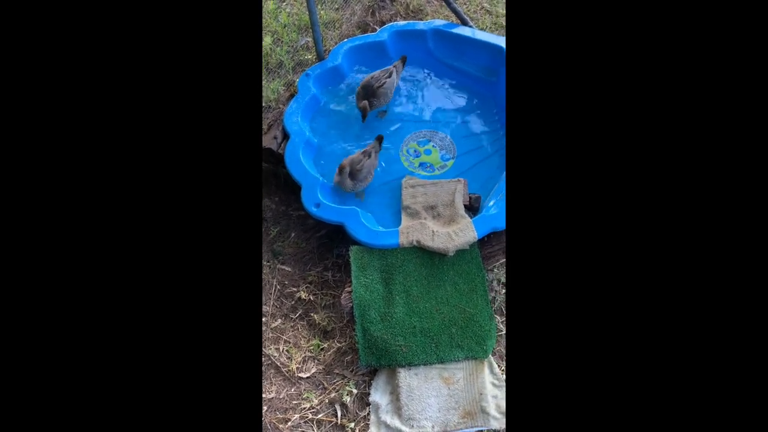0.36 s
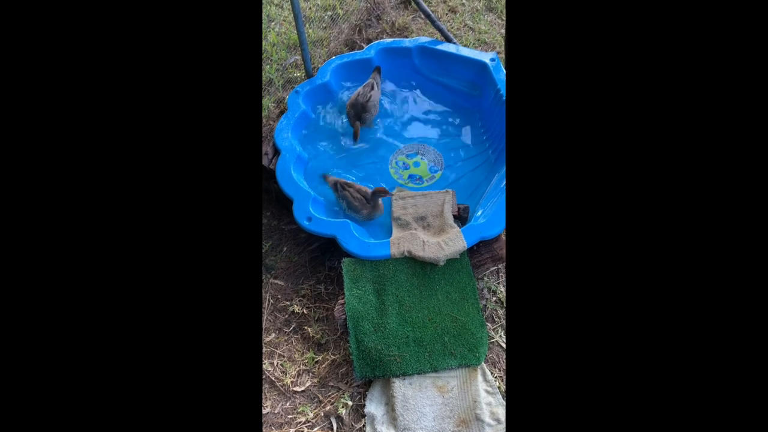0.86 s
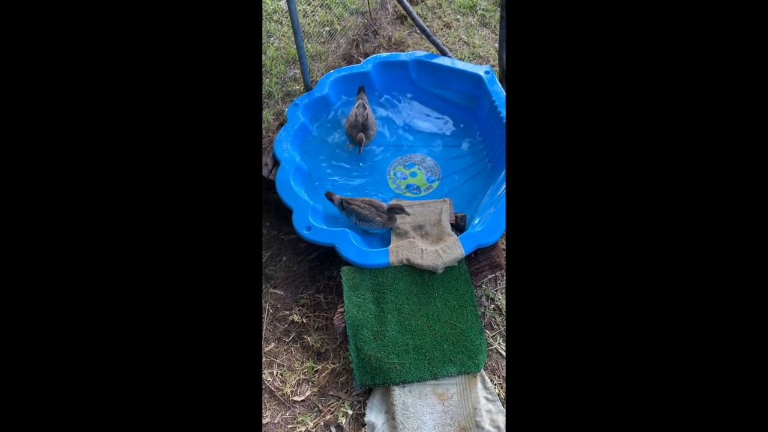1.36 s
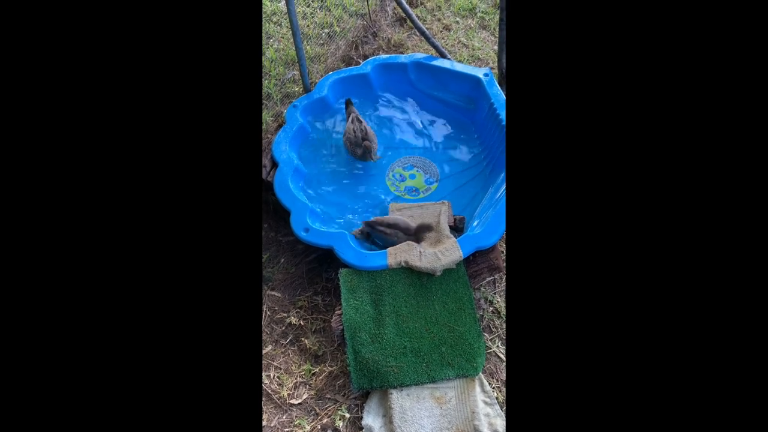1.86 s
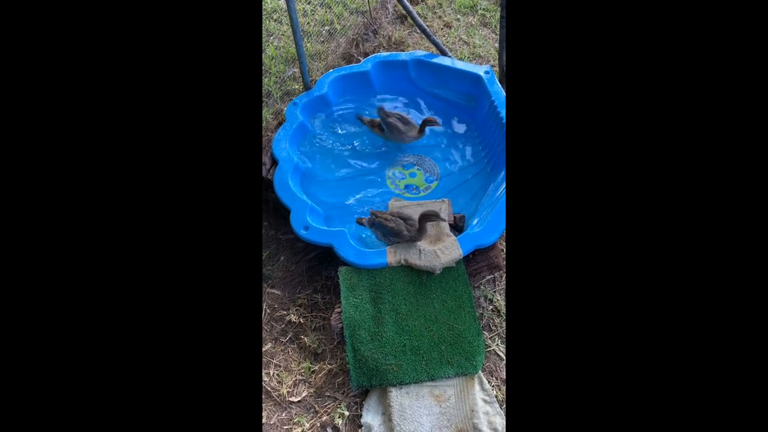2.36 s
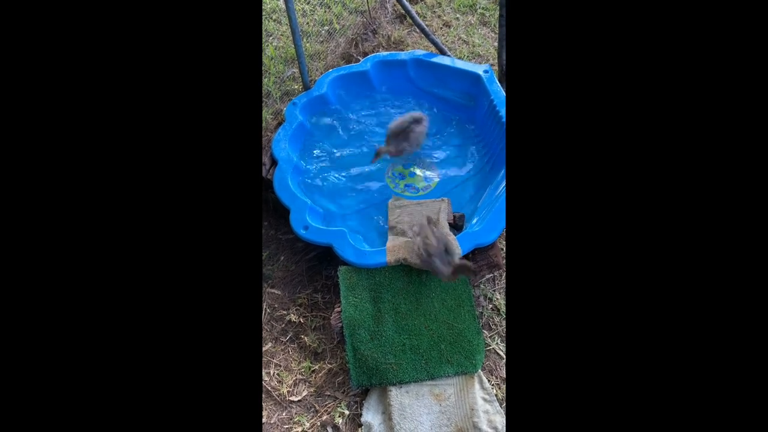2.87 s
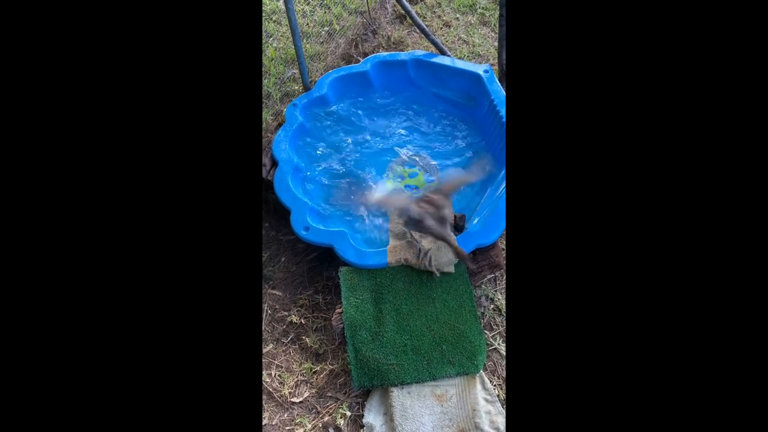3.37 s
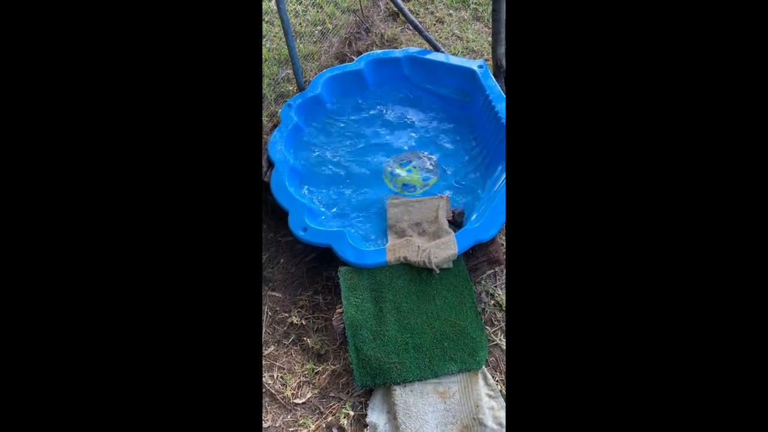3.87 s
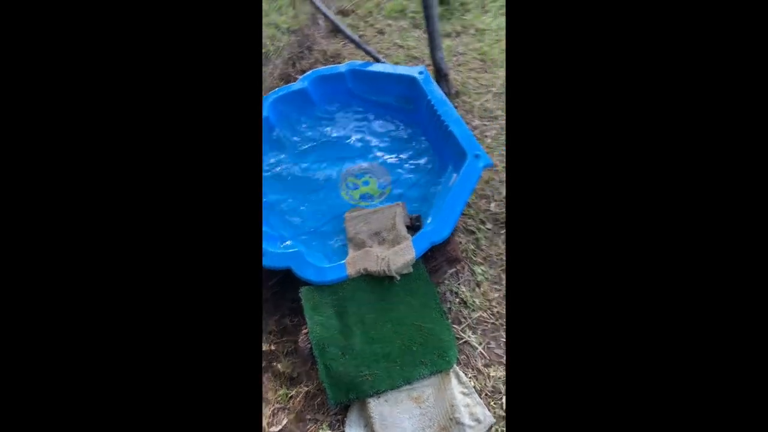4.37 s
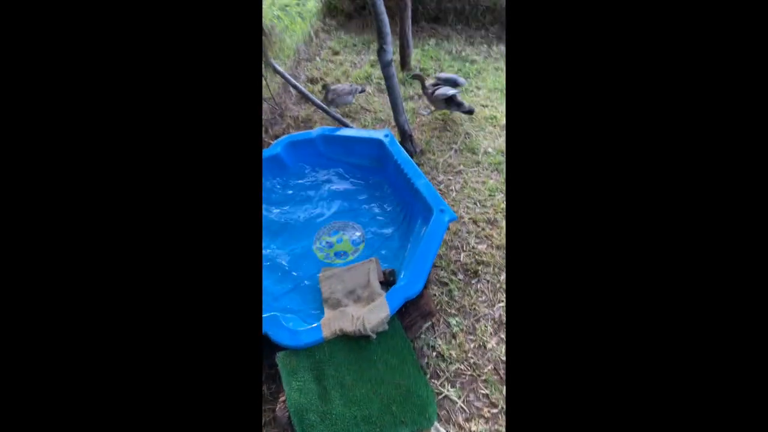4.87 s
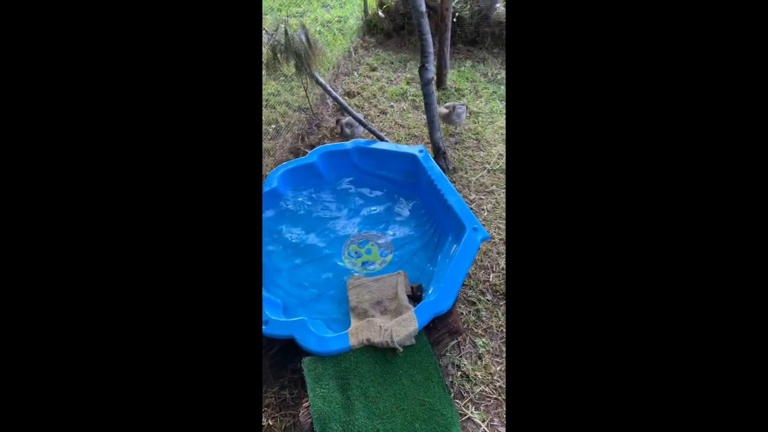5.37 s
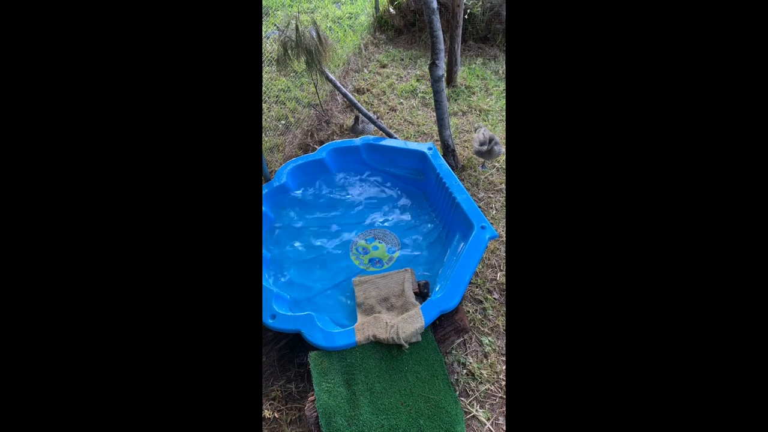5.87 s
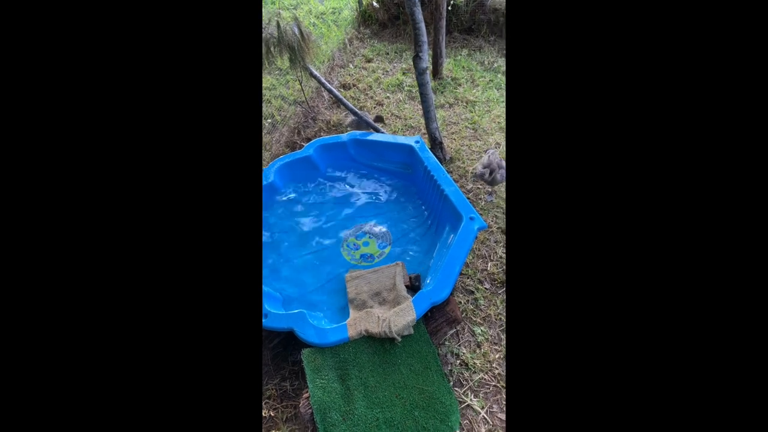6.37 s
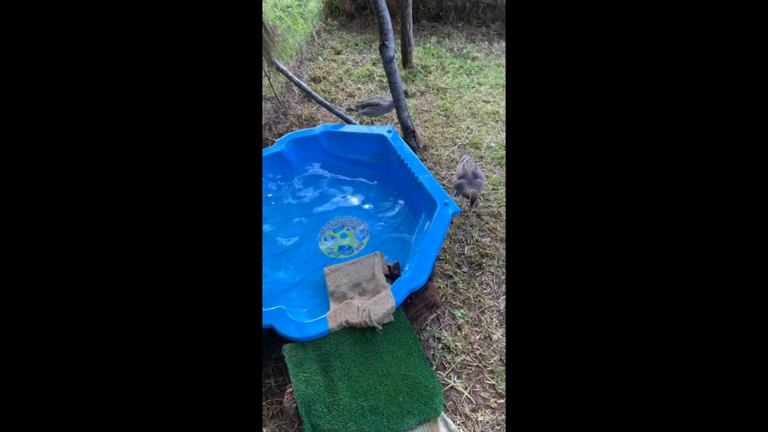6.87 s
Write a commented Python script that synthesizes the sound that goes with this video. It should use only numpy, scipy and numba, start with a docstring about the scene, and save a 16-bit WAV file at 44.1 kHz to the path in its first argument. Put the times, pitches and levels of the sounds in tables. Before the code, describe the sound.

Outdoors in a quiet garden, close to a phone. Soft peeps and a small knock come first, then a run of loud, high whistles that crack upward. Paddling bursts into splashing, builds to violent thrashing with hollow plops, gurgles and hissing spray, then drops away. Wet wings flutter out fine spray on the lawn, and a few drips and faint peeps remain over low rumble.

```python
"""Two ducklings in a shallow plastic pool on a lawn, a metre or two from a phone, which is knocked early on.
First come peeps, then held near-sine whistles that break upward; paddling grows into thrashing, in which
trapped air rings as decaying sines, drops tick as noise cracks, and filtered noise sloshes, gurgles and hisses.
Wet wings are then shaken out on the lawn as bursts of fine spray, and sparse drips and faint peeps follow.
Coloured noise makes a quiet garden rumble throughout; two ports hear the treble at different moments."""
import sys
import numpy as np
from scipy import signal
from scipy.fft import rfft, irfft
from scipy.io import wavfile
from scipy.ndimage import uniform_filter1d
from numba import njit

SR = 44100
rng = np.random.default_rng(int(sys.argv[2]) if len(sys.argv) > 2 else 0)


def store_pcm(level_fs):
    """Save levels as 16-bit WAV."""
    pcm = np.round(np.clip(level_fs, -1, 1) * 32767).astype(np.int16)
    wavfile.write(sys.argv[1], SR, np.atleast_2d(pcm).T)


def volts_from_db(level):
    """Convert decibel levels to linear amplitude ratios."""
    exponent = np.asarray(level, float) / 20
    return 10 ** exponent


N = 308259
T = np.arange(N) / SR
HZ = np.arange(N // 2 + 1) * SR / N


def level(x, db):
    """Root-mean-square scaling: sets the mean power of a signal in dB."""
    return x * volts_from_db(db) / np.sqrt(np.mean(x ** 2))


def curve_db(points):
    """Logarithmic frequency scale: joins (Hz, dB) points by lines over log frequency."""
    hz, db = np.transpose(points)
    return np.interp(np.log(HZ + 1), np.log(hz), db)


def colour(x, points):
    """Spectral shaping: multiplies the spectrum by the gain through (Hz, dB) points."""
    return irfft(rfft(x) * volts_from_db(curve_db(points)), N)


def band(x, lo_hz, hi_hz):
    """Band-pass filtering: keeps the energy between two corner frequencies."""
    return signal.sosfilt(signal.butter(2, [lo_hz, hi_hz], "band", fs=SR, output="sos"), x)


def walk(rate):
    """Slow random modulation: normal values held 1 / rate s and smoothed twice; spread near 1."""
    hold = int(SR / rate)
    steps = np.repeat(rng.standard_normal(N // hold + 1), hold)
    return 1.54 * uniform_filter1d(uniform_filter1d(steps, hold), hold)[:N]


def add(out, s, x):
    """Superposition: mixes x in from time s."""
    i = max(int(s * SR), 0)
    out[i:i + len(x)] += x[:N - i]


def peeps():
    """Vocal nonlinearity: near-sine whistles break at the top into overtones, a half-pitch line and rasp."""
    # partials of the voice: multiple, calm_db in a steady whistle, wild_db where the voice breaks
    overtones = [(2, -25, -12), (3, -33, -30)]
    break_hz = 3050  # above this pitch the voice breaks
    out, tremor = np.zeros(N), walk(250)
    rasp = level(band(rng.standard_normal(N), 2000, 7300), 0)
    # level and pitch of a call warble together
    rough, warble = walk(1200), walk(110)
    for call in calls():
        s, hz, db = np.transpose(call)
        i = np.arange(int((s[0] - .005) * SR), int((s[-1] + .006) * SR))
        edge = np.clip(np.minimum(T[i] - T[i[0]], T[i[-1]] - T[i]) / .005, 0, 1)
        pitch = uniform_filter1d(np.interp(T[i], s, hz), size=130) * (1 + .012 * warble[i])
        broken = np.clip((pitch - break_hz) / 600., 0, 1)
        # the falling end stays hoarse
        hoarse = np.maximum(broken, .4 * np.maximum.accumulate(broken))
        shaken_pitch = pitch * (1 + (.008 + .05 * hoarse) * tremor[i])
        phase = 2 * np.pi * np.cumsum(shaken_pitch) / SR
        tone = np.sin(phase)
        for k, calm_db, wild_db in overtones:
            partial_db = calm_db + (wild_db - calm_db) * broken + throat_db(k * pitch)
            tone += volts_from_db(partial_db) * np.sin(k * phase)
        tone += .5 * broken ** 3 * np.sin(phase / 2)
        tone *= 1 + (.07 + .6 * hoarse) * rough[i] + .1 * tremor[i[::-1]]
        loudness = np.sqrt(2) * edge * volts_from_db(np.interp(T[i], s, db) + 2.6 * warble[i])
        # air keeps rushing through the break while the tone drops out
        air = uniform_filter1d(loudness, size=1200) * uniform_filter1d(broken, size=400)
        out[i] += loudness * tone + 0.26 * air * rasp[i]
    return out + reflections(out)


def reflections(calls_dry):
    """Diffuse reflection: pool wall and ground send back a short blur, as convolution with fading noise."""
    t = T[:int(.25 * SR)]
    blur = rng.standard_normal(len(t)) * np.exp(-t / .045) * (t > .004)
    # once the birds have run off across the lawn the blur weighs more
    wet_db = np.interp(T, [3.5, 4.5], [-15, -8])
    return volts_from_db(wet_db) * signal.fftconvolve(calls_dry, blur / np.linalg.norm(blur))[:N]


def throat_db(hz):
    """Formant resonance: gain of the throat on the overtones that pass it."""
    # throat resonance: centre_hz, width_hz, gain_db
    throat = (7320, 1900, 6)
    centre_hz, width_hz, db = throat
    return db * np.exp(-((hz - centre_hz) / width_hz) ** 2)


def calls():
    """Frequency and level contours: every call as points (s, Hz, dB), drawn from two shapes."""
    # long calls, a held whistle that breaks upward and drops:
    # start_s, break_s, end_s, first_hz, break_hz, whistle_db, swell_db into it, drop_db
    whistles = [(1.02, 1.103, 1.157, 1850, 2945, -38, 1, -45),
                (1.185, 1.238, 1.295, 2500, 2930, -31.5, 8.5, -43),
                (1.31, 1.362, 1.42, 2596, 3146, -29.5, 3.5, -34),
                (1.425, 1.497, 1.562, 2635, 3190, -24, 12.5, -40.5),
                (1.537, 1.549, 1.59, 2497, 3140, -36.5, 2, -53),
                (2.133, 2.192, 2.265, 1950, 3080, -30.5, 4, -33),
                (2.44, 2.487, 2.543, 2480, 2936, -31.5, 7, -33.5),
                (2.668, 2.708, 2.772, 2330, 2650, -29, 3, -27),
                (4.979, 5.0, 5.035, 1740, 2200, -51.5, .1, -58),
                (5.196, 5.211, 5.243, 2360, 2650, -57.5, 4, -62),
                (5.297, 5.324, 5.354, 2580, 2900, -63.5, 1.1, -57),
                (5.814, 5.823, 5.866, 2130, 2500, -45.5, 9, -53.5),
                (5.928, 5.963, 6.018, 2200, 2637, -47, -1.1, -53.5),
                (6.066, 6.094, 6.146, 2324, 2740, -44, 12, -49.5)]
    # the drop: share of the flight from break to end, ratio to break_hz, share of the leap left,
    # relative_db on drop_db
    fall = [(.55, 1.01, .7, -11), (.68, 1.01, .15, -0.3), (.8, .88, 0, -2), (1, .75, 0, -7)]
    # short arched peeps: start_s, length_s, first_hz, middle_hz, last_hz, level_db
    chips = [(0.072, 0.053, 1610, 2500, 1710, -61), (0.437, 0.037, 2010, 2440, 1900, -47),
             (0.606, 0.029, 2540, 2240, 1950, -50.5), (1.213, 0.031, 2040, 2340, 3000, -44),
             (1.255, .022, 2750, 2400, 1900, -47), (1.372, .02, 2800, 2450, 2050, -45),
             (1.432, 0.016, 2270, 2470, 2960, -41), (2.059, 0.028, 2180, 2580, 2160, -43),
             (4.117, .035, 2490, 2380, 2110, -57), (4.28, 0.024, 2760, 2440, 2060, -59),
             (4.4, 0.03, 2530, 2520, 2340, -57), (5.083, .03, 2183, 2470, 2716, -62),
             (5.72, .065, 3200, 3100, 3080, -68), (5.756, 0.053, 1632, 2170, 2240, -63),
             (6.242, 0.035, 1730, 2120, 1900, -53.5), (6.603, 0.028, 1930, 1853, 1580, -61),
             (6.77, 0.025, 1760, 1894, 1667, -67)]
    held, climb = .905, 1.005  # held pitch as a ratio to the break pitch, and its upward creep
    settle, lift_s = 0.3, .013  # share of the whistle to reach that pitch; time it is left ahead of the break
    out = []
    for start, brk, end, first_hz, break_hz, db, swell_db, drop_db in whistles:
        settled, flight = start + settle * (brk - start), end - brk
        lift = max(brk - lift_s, (settled + brk) / 2)
        # the longer the flight, the higher the leap and the more the tone fails at its top
        leap = np.clip(31 * (flight - .027), 0, .55)
        points = [(start, first_hz, db - swell_db - 9),
                  (settled, held * break_hz, db - swell_db),
                  (lift, climb * held * break_hz, db),
                  (brk, break_hz, db),
                  (brk + .27 * flight, (1 + leap) * break_hz, db - 480 * flight)]
        for share, ratio, left, rel_db in fall:
            points.append((brk + share * flight, (ratio + left * leap) * break_hz, drop_db + rel_db))
        out.append(points)
    u = np.linspace(-1, 1, 9)
    for start, length, first_hz, mid_hz, last_hz, db in chips:
        arch = mid_hz + (last_hz - first_hz) / 2 * u + ((first_hz + last_hz) / 2 - mid_hz) * u ** 2
        # both ends are 4 dB softer than the middle
        out.append(np.transpose([start + length * (u + 1) / 2, arch, db - 4 * u ** 2]))
    return out


def bubbles():
    """Bubble resonance: air pockets ring, climbing as they shrink or sinking as the hollow opens."""
    # pockets of air in the water, before wobble and flutter:
    # peak_s, peak_db, pitch_hz at the peak, t60_ms, initial glide in octaves per 10 ms
    pockets = [(.44, -49.5, 364, 60, -.05), (0.469, -44, 1530, 40, -.05), (.616, -28.5, 285, 72, -.28),
               (.639, -32.5, 233, 71, -.54), (0.903, -45, 2200, 16, .5), (.903, -42, 633, 89, .1),
               (0.915, -45.5, 1400, 34, .12), (1.052, -49.5, 567, 60, .07), (1.61, -40.5, 1007, 200, .02),
               (1.62, -42, 3970, 20, -.03), (1.69, -25.5, 847, 30, -.02), (1.692, -38, 1750, 18, -.4),
               (1.717, -23.5, 1136, 22, .8), (1.755, -23, 1110, 17, .3), (1.755, -15, 2054, 25, -.38),
               (1.76, -21, 377, 85, -.06), (1.848, -28, 1120, 19, -.5), (1.855, -26.5, 319, 82, -.1),
               (1.867, -28.5, 1050, 60, .01), (1.895, -22, 555, 45, -.16), (1.939, -24, 548, 37, .29),
               (1.941, -26, 1780, 15, .4), (1.964, -25, 1286, 22, -.33), (1.998, -30, 1280, 15, .3),
               (2.116, -32.5, 530, 69, .02), (2.145, -30.5, 1080, 52, .11), (2.264, -25, 307, 41, .05),
               (2.294, -27, 1486, 92, .07), (2.325, -27, 1590, 15, -.26), (2.328, -37.5, 916, 111, -.13),
               (2.364, -38, 4690, 15, -.06), (2.395, -26, 1171, 94, -.01), (2.429, -30.5, 940, 48, -.53),
               (2.451, -25.5, 904, 58, -.11), (2.472, -24.5, 319, 46, -.34), (2.543, -34.5, 770, 39, -.26),
               (2.571, -32, 324, 49, -.02), (2.593, -19, 1680, 16, -.14), (2.603, -28, 2200, 45, .15),
               (2.643, -28, 1610, 20, -.21), (2.667, -29, 645, 34, -.07), (2.692, -26, 510, 57, -.29),
               (2.702, -14.5, 300, 49, .32), (2.717, -14.5, 306, 47, .28), (2.776, -22, 310, 57, -.19),
               (2.878, -18, 2250, 36, .13), (2.903, -25.5, 658, 168, .04), (2.954, -32, 2807, 11, .37),
               (2.962, -21.5, 293, 97, .47), (2.975, -15, 597, 30, -.59), (2.988, -20.5, 760, 30, -.72),
               (2.992, -19, 272, 59, -.06), (3.003, -22.5, 2106, 25, .09), (3.014, -25, 241, 57, .04),
               (3.02, -25.5, 384, 60, -.03), (3.058, -27.5, 300, 50, -.5), (3.086, -19, 559, 180, .01),
               (3.099, -26, 1430, 31, -.16), (3.116, -25, 1570, 15, .67), (3.154, -26.5, 2640, 45, .06),
               (3.155, -14.5, 569, 30, -.7), (3.162, -17.5, 319, 39, -.27), (3.173, -21, 4140, 15, -.19),
               (3.171, -20, 880, 19, -.56), (3.173, -14, 1861, 74, -.03), (3.18, -20.5, 256, 60, -.08),
               (3.218, -25, 620, 37, -.25), (3.225, -27, 1335, 45, .09), (3.223, -21.5, 382, 54, -.21),
               (3.244, -19.5, 1095, 56, -.05), (3.262, -23.5, 1850, 52, -.09), (3.27, -25, 325, 64, -.14),
               (3.31, -30.5, 2510, 11, -.13), (3.339, -4.5, 596, 37, -.16), (3.349, -12, 385, 50, -.06),
               (3.363, -29.5, 300, 60, .11), (3.396, -29, 3130, 15, -.6), (3.412, -22, 1525, 11, -.01),
               (3.409, -20, 580, 37, .39), (3.428, -30.5, 911, 30, -.47), (3.457, -18.5, 1767, 34, -.17),
               (3.498, -24, 327, 82, -.11), (3.502, -21.5, 1240, 22, -.78), (3.536, -26, 853, 19, -.75),
               (3.54, -28, 320, 52, -.66), (3.562, -18.5, 1052, 52, -.01), (3.588, -32.5, 3600, 15, -.14),
               (3.632, -36, 1070, 26, -.38), (3.682, -37, 272, 60, .01), (3.713, -34.5, 1932, 22, -.11),
               (3.715, -29, 316, 63, -.19), (3.864, -37.5, 1943, 15, -.52), (4.345, -38.5, 1710, 9, -.69),
               (4.534, -43.5, 1780, 26, -.17), (5.765, -47, 1256, 30, .17)]
    out, wobble, flutter = np.zeros(N), walk(300), walk(500)
    turn = rng.random((len(pockets), 1))
    for (s, db, hz, t60_ms, glide), (start,) in zip(pockets, turn):
        # a pocket swells for a fixed time plus some cycles of its pitch
        rise, t60 = .0012 + 1.7 / hz, t60_ms / 1000
        t = np.arange(-2 * rise * SR, t60 * SR) / SR
        shape = np.where(t < 0, np.exp(-(t / rise) ** 4), 10 ** (-3 * np.abs(t) / t60))
        i = slice(int(s * SR), int(s * SR) + len(t))
        octaves = .4 * np.tanh(glide * t / .01 / .4)  # the glide levels off at 0.4 octave
        pitch = hz * 2 ** octaves * (1 + 0.044 * wobble[i])
        ring = np.sin(2 * np.pi * (start + np.cumsum(pitch) / SR))
        add(out, s - 2 * rise, volts_from_db(db + 2.5 * flutter[i]) * shape * ring)
    return out


def drops():
    """Impact transients: a sub-millisecond noise crack with a short spray tail, in body, tick and top."""
    # drops and slaps, and at 0.197 s the click of the knock on the phone, before band-pass: # start_s,
    # crack_db, body_db and top_db relative to the tick
    impacts = [(0.197, -17, -54, -2.5), (0.2678, -45.5, 6.5, -10), (1.6477, -32.5, 15.5, 2.5),
               (1.6886, -38.5, -10, -5), (1.6958, -14.5, 0, -5.5), (1.7375, -25, -4.5, -1.5),
               (1.7542, -12, 3.5, -1.5), (1.7799, -29.5, -28, 5), (1.9238, -23.5, -21, -20.0),
               (1.9395, -29, 13.5, 10.5), (1.9607, -25.5, -13, -4.5), (2.0765, -38, -6, -11),
               (2.0969, -31.5, -30, 3.5), (2.1087, -41, -8, 8), (2.2037, -40, 23.5, 4),
               (2.2813, -14.5, -21, 1.5), (2.286, -22, -10, -18), (2.3222, -27.5, 5.5, -10.5),
               (2.3631, -28, 3, 3), (2.3948, -20.5, -3, -4.5), (2.4337, -30, 2, -5), (2.5531, -29, -12, -8),
               (2.5579, -42, -14, -8), (2.5866, -35, 16.5, -3.5), (2.6375, -25, -28, -8),
               (2.6474, -23, -12.0, -12), (2.6609, -39, -5, 9), (2.8415, -24, 8.5, -1),
               (2.8619, -27, -13, 8), (2.8871, -17, 4.5, -3), (2.9495, -13.5, 6, 0), (3.0101, -16, 1.5, -9),
               (3.0163, -17.5, -7.5, 5), (3.036, -15, -1, -8), (3.0617, -26, -3.5, 8),
               (3.1144, -21, -7.5, 0), (3.1371, -17, -15, -11), (3.153, -15.5, 2.5, -1.5),
               (3.1899, -18.5, -0.5, 10), (3.2174, -12.5, -9.5, -1), (3.2224, 2, -20.5, -10.5),
               (3.2927, -28, -11.5, 1), (3.3083, -13.5, 1, -9), (3.3371, -15.5, -10.5, 0.5),
               (3.4065, -28.5, 6.5, 8), (3.4117, -30.5, 5, -2), (3.4636, -23, -12, -9), (3.534, -31, 3, -5),
               (3.5601, -30, 11.5, -5), (3.6312, -26, -8, 1.5), (3.6447, -35.5, -24.0, 13),
               (3.6694, -40.5, -13, 5), (3.709, -42, 2, -10), (3.7133, -17, -9.5, 2.5),
               (3.7173, -37, -15, -3), (3.806, -25, -2, 1), (3.9774, -32, -1, 0.5), (4.2111, -25, -10, -15),
               (4.2989, -43, -8, 8), (4.3184, -28, -5, 0.5), (4.3376, -25, -5.5, -0.5),
               (4.3443, -32, 6.5, -1.5), (4.5199, -35, -14, 13), (4.5371, -24.5, -6, 0.5),
               (4.6127, -43.5, -28.0, 17), (4.686, -53, -37, 2.0), (4.7252, -43.5, -19, 11),
               (4.9938, -40, 6.5, -1), (5.5266, -54, -14, 5), (5.5558, -45, -18, 7.5), (5.7207, -49, -7, 8),
               (5.9721, -35.5, -14, -7.5), (6.1487, -43, 6, 2), (6.9753, -44, -28, 11.5)]
    t = T[:int(.04 * SR)]
    layers = np.zeros((3, N))
    shape = (1 - np.exp(-t / 0.00021)) * (np.exp(-t / 0.00048) + volts_from_db(-12) * np.exp(-t / 0.0016))
    noise = rng.standard_normal((len(impacts), len(t)))
    for (s, db, body_db, top_db), grain in zip(impacts, noise):
        crack = grain * shape
        crack = crack / np.sqrt(np.mean(crack[:30] ** 2))  # unit rms over the first 30 samples
        for layer, rel_db in zip(layers, (body_db, 0, top_db)):
            add(layer, s, volts_from_db(db + rel_db) * crack)
    body, tick, top = layers
    return band(body, 1300, 4500) + band(tick, 3700, 9000) + band(top, 9300, 19845)


def churn():
    """Turbulence and cavity resonance: slosh, gurgles and spray; also gurgles that come from all round."""
    # resonances of the pool hollow: centre_hz, width_hz, relative_db
    hollow = [(225, 170, 5.5), (300, 38, 5), (580, 18, -21)]
    # spectrum of the spray noise: frequency_hz, relative_db
    spray_curve = [(600, -38.5), (1500, 0), (2500, -2.5), (4000, -0.8), (6500, 1.5), (8000, -6),
                   (10000, -13), (16000, -39)]
    # spectrum of the fine spray noise: frequency_hz, relative_db
    fine_curve = [(3000, -39), (7000, -14), (9500, -2.15), (12000, 1.5), (16000, 0)]
    gains = efforts()
    push = rng.standard_normal(N) * volts_from_db(3.2 * walk(60))
    slosh = sum(volts_from_db(db) * signal.lfilter(*signal.iirpeak(hz, hz / width, SR), push)
                for hz, width, db in hollow)
    crackle = rng.standard_normal(N) * volts_from_db(1.8 * walk(900) + 1.1 * walk(110))
    crackle = patchy(crackle, 500, 18000, count=14, flicker_db=3.0, rate=90)
    fizz = swarm(count=4000, lo_hz=2500, hi_hz=8300, cycles=33.0, scatter_db=1.5, glide=.2)
    spray = level(colour(crackle, spray_curve), 0) + 0.21 * fizz
    fine = level(colour(crackle, fine_curve), 0)
    layers = (slosh, gurgles(), spray, fine)
    water = sum(gain * level(x, 0) for x, gain in zip(layers, gains))
    around = volts_from_db(-8) * gains[1] * gurgles()
    return water, around


def gurgles():
    """Collective bubble sound: a swarm of small resonators over the noise of rushing water."""
    bubbling = swarm(count=3000, lo_hz=550, hi_hz=3200, cycles=35., scatter_db=4.5, glide=.25)
    rush = band(rng.standard_normal(N), 730, 2600) * volts_from_db(3 * walk(90))
    rush = patchy(rush, 300, 6000, count=8, flicker_db=4.0, rate=70)
    return level(bubbling + .8 * level(rush, 0), 0)


def swarm(count, lo_hz, hi_hz, cycles, scatter_db, glide):
    """Random superposition: many bubbles, a few much louder than the rest; rms 1."""
    when, pitch, size = rng.random((count, 3)).T
    hz = lo_hz * (hi_hz / lo_hz) ** pitch
    start = (when * N).astype(np.int64)
    loudness = volts_from_db(-scatter_db * np.log(1 - .98 * size))
    return level(rings(N, start, hz, cycles / hz, loudness, glide, 1. * SR), 0)


@njit
def rings(n, start, hz, t60, size, glide, sr):
    """Damped oscillation: small bubbles as sines that die away while their pitch rises."""
    out = np.zeros(n)
    for k in range(len(start)):
        length = int(t60[k] * sr)
        step = 2 * np.pi * hz[k] / sr
        fade = np.exp(-np.log(1000.) / (t60[k] * sr))
        phase, a = 0., size[k]
        for i in range(start[k], min(start[k] + length, n)):
            out[i] += a * np.sin(phase)
            phase += step * (1 + glide * (i - start[k]) / length)
            a *= fade
    return out


def patchy(x, lo_hz, hi_hz, count, flicker_db, rate):
    """Independent band modulation: narrow bands flicker as water patches burst at different sizes."""
    edges = np.geomspace(lo_hz, hi_hz, count + 1)
    spectrum = rfft(x)
    out = np.zeros(N)
    for lo, hi in zip(edges, edges[1:]):
        strip = irfft(spectrum * ((HZ >= lo) & (HZ < hi)), N)
        out += strip * volts_from_db(flicker_db * walk(rate))
    return out


def efforts():
    """Addition of powers: gains of slosh, gurgle, spray and fine spray from strokes, shakes and settling."""
    # strokes of feet, wings and bodies in the water:
    # peak_s, slosh_db, gurgle_db, spray_db, fade_ms (time to fade 20 dB)
    splashes = [(.19, -48, -58, -56, 89), (.613, -38.5, -68, -82, 43), (.645, -50.5, -75, -85, 68),
                (.915, -64, -57, -75, 125), (1.58, -53.5, -61.5, -76, 62), (1.637, -49.5, -42.5, -53.5, 62),
                (1.692, -38.5, -27, -28.5, 54), (1.758, -21, -21, -30.5, 37.5),
                (1.845, -44.5, -38, -56, 100), (1.894, -32, -39, -44.5, 107),
                (1.949, -25.5, -27.5, -41, 74), (1.995, -37, -36.5, -54.5, 60.5),
                (2.051, -37.5, -55, -75, 38), (2.103, -43, -49, -62, 80), (2.193, -40, -34, -46, 98),
                (2.264, -38.5, -62, -65, 41.5), (2.29, -38, -57, -41.5, 34), (2.34, -66, -44, -43.5, 105),
                (2.397, -40.5, -44.5, -39.5, 43), (2.452, -35, -35, -53, 127),
                (2.53, -36.5, -34.5, -59, 88), (2.594, -42, -33, -36.5, 61), (2.653, -47, -39.5, -43, 56),
                (2.7, -23.5, -40, -63, 61.5), (2.74, -36.5, -59, -40, 56), (2.765, -34.5, -52, -52.5, 59.5),
                (2.863, -46, -34.5, -33.5, 61), (2.895, -42, -26.5, -30.5, 107),
                (2.95, -30.5, -31.5, -35, 83), (2.985, -20, -26.5, -38.5, 60.5),
                (3.012, -27.5, -30, -31.5, 68.5), (3.082, -34, -31, -43.5, 110),
                (3.115, -32.5, -33.5, -40, 80), (3.152, -26.5, -21, -27.5, 60), (3.173, -21, -17, -26, 46),
                (3.219, -29, -32, -16, 22), (3.253, -26.5, -27, -32.5, 70.5), (3.323, -35.5, -35, -31, 49),
                (3.341, -21.5, -26, -30.5, 60), (3.37, -32, -40, -40, 70), (3.41, -36, -33.5, -37.5, 102.5),
                (3.455, -41, -36.5, -35.5, 89.5), (3.5, -30.5, -37, -41, 84),
                (3.536, -31.5, -40.5, -54, 45), (3.566, -46, -33.5, -40, 40), (3.63, -65.5, -55, -43.5, 98),
                (3.72, -39.5, -48, -54, 52)]
    # wet wings flapped and shaken on the lawn:
    # peak_s, fine_spray_db, spray_db, thud_db, fade_ms (time to fade 20 dB)
    shakes = [(3.5, -38, -60, -70, 50), (3.682, -38, -44, -47, 68), (3.714, -26, -37, -53, 39),
              (3.807, -39, -45.5, -58.5, 196), (3.979, -38, -57.5, -57, 210),
              (4.208, -41.5, -54, -61.5, 104.5), (4.243, -66, -64, -49, 44), (4.353, -39, -49.5, -50, 64),
              (4.46, -35.5, -62, -59, 88), (4.54, -37, -48, -56.5, 50), (4.643, -44, -55, -64, 45),
              (4.705, -35, -51, -57.5, 45), (4.815, -40.5, -63, -82, 85), (4.993, -53, -58, -72, 125),
              (5.1, -56, -80, -68, 54), (5.559, -50.5, -64, -73, 79), (5.723, -60, -65, -70, 71),
              (5.839, -61, -58.5, -65, 75), (5.972, -68, -53, -75, 68), (6.099, -76.5, -52.5, -72, 35),
              (6.148, -66, -57, -74, 55), (6.23, -64, -66, -63, 150), (6.549, -61, -62, -76, 99),
              (6.723, -64, -70, -70, 98), (6.966, -58, -71, -80, 100)]
    # water left rocking and dripping: time_s, slosh_db, gurgle_db, drizzle_db
    settling = [(0, -86, -73, -79), (.3, -67, -69, -83), (.9, -68, -78, -80), (1.1, -69, -71.5, -71),
                (1.55, -59, -64, -76), (1.8, -45, -46.5, -44.5), (2.1, -52, -50, -90), (2.8, -57, -45, -79),
                (3.1, -37, -35, -43.5), (3.6, -52, -58, -49), (4.15, -67, -66.5, -53.5),
                (4.7, -56, -77, -58), (5.2, -71.5, -77, -71), (5.701, -68, -76, -73.5),
                (6.05, -62.5, -68, -76), (6.2, -56.5, -66, -77), (6.45, -63, -90, -80.5),
                (7, -65, -79.5, -74)]
    s, *columns = np.transpose(settling)
    rest = [volts_from_db(np.interp(T, s, c)) ** 2 for c in columns]
    slosh, gurgle, spray = bursts(splashes, rise_shares=[0.54, 0.23, .25]) + rest
    mist, shed, thud = bursts(shakes, rise_shares=[0.46, 0.33, 0.45])
    return np.sqrt([slosh + volts_from_db(-3) ** 2 * thud,
                    gurgle + thud,
                    spray + shed,
                    volts_from_db(-0.5) ** 2 * spray + mist])


def bursts(rows, rise_shares):
    """Exponential decay: power envelopes of three level columns, a quick rise and an even fade in dB."""
    power = np.zeros((3, N))
    share = np.array(rise_shares)[:, None]  # rise time against fade time
    for s, *dbs, fade_ms in rows:
        fade = fade_ms / 1000
        i = slice(max(int((s - 2 * fade) * SR), 0), int((s + 2 * fade) * SR))
        t = T[i] - s
        slope_db = 20 * np.where(t > 0, t, -t / share) / fade
        power[:, i] += volts_from_db(np.array(dbs)[:, None] - slope_db) ** 2
    return power


def knock():
    """Damped chirp: a thump drops quickly from a click to the low wobble of the hand-held case."""
    # a knock on the phone: peak_db, extra_hz above the last pitch at first, last_hz,
    # glide_ms (time constant), t60_ms
    thump = (-28.5, 790, 55, 2, 174)
    db, extra_hz, last_hz, glide_ms, t60_ms = thump
    out, t_ms = np.zeros(N), 1000 * T[:int(.2 * SR)]
    pitch = last_hz + extra_hz * np.exp(-t_ms / glide_ms)
    wobble = np.sin(2 * np.pi * np.cumsum(pitch) / SR)
    add(out, .1975, volts_from_db(db) * 10 ** (-3 * t_ms / t60_ms) * wobble)
    return out


def garden():
    """Coloured noise: far traffic and leaves as a low rumble that swells, over a faint hiss."""
    # spectrum of the background: frequency_hz, relative_db
    garden_curve = [(20, -21), (35, -12.5), (55, 6.5), (90, 1), (200, -10.5), (400, -15), (700, -44),
                    (1200, -34.5), (1900, -28.5), (3500, -34.5), (8000, -34.5), (16000, -30)]
    noise = colour(rng.standard_normal(N), garden_curve)
    low = signal.sosfilt(signal.butter(2, 500, fs=SR, output="sos"), noise)
    return level(low * volts_from_db(1.7 * walk(5.5)) + (noise - low) * volts_from_db(1.4 * walk(18)), -57)


def ports(near, far, unalike):
    """Interchannel phase and level: all sound has a lead, near sound a tilt, and a part opposite signs."""
    # phase between the ports: frequency_hz, right_lead_rad
    port_lead = [(0, 0), (150, .15), (600, .9), (1300, 0), (2600, -1.2), (3700, -1.4), (4740, -np.pi),
                 (8870, -3 * np.pi), (13000, -5 * np.pi), (17140, -7 * np.pi), (22050, -7 * np.pi)]
    # level between the ports: frequency_hz, left_minus_right_db
    port_balance = [(40, .4), (300, 1.5), (600, -1.5), (1000, -4), (1500, -1.5), (2500, -4), (3400, 0),
                    (16000, 0)]
    # share of far or scattered sound that the ports hear unalike: frequency_hz, gain_db
    unalike_curve = [(60, -13), (150, -10), (400, 0), (2500, 0), (3600, -4), (4600, -25), (16000, -40)]
    # each port takes half of the difference
    lead = np.interp(HZ, *np.transpose(port_lead)) / 2
    tilt_db = curve_db(port_balance) / 2
    near, far, unalike = rfft(near), rfft(far), rfft(colour(unalike, unalike_curve))
    sides = []
    for sign in (1, -1):
        spectrum = near * volts_from_db(sign * tilt_db) + far + sign * unalike
        sides.append(irfft(spectrum * np.exp(-1j * sign * lead), N))
    return np.array(sides)


def scene():
    """Direct and scattered fields: birds and water near, garden all round, scatter off hand and pool."""
    water, around = churn()
    near = band(peeps() + bubbles() + drops() + water, 37, 19845) + knock()
    t = T[:int(.03 * SR)]
    scatter = rng.standard_normal(len(t)) * np.exp(-t / 0.0057)
    scattered = volts_from_db(-13) * signal.fftconvolve(near, scatter / np.linalg.norm(scatter))[:N]
    return ports(near, garden(), garden() + around + band(scattered, 980, 5700))


def roll_off(x):
    """The treble ends steeply here."""
    return signal.sosfilt(signal.butter(12, 16650, fs=SR, output="sos"), x)


def record(dry):
    """Band limiting and clipping: the phone cuts the top above 15.7 kHz and clips at full scale."""
    cut = signal.sosfilt(signal.ellip(8, .2, 70, 15700, fs=SR, output="sos"), dry)
    return roll_off(np.clip(cut, -1, 1))


dry = scene()
out = record(dry)
store_pcm(out)
```